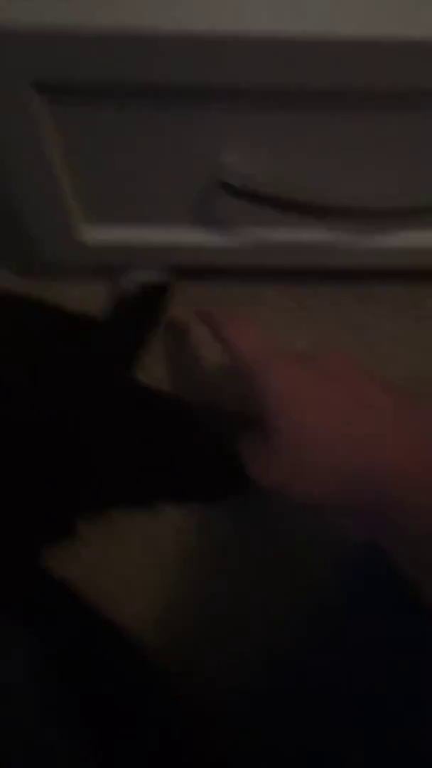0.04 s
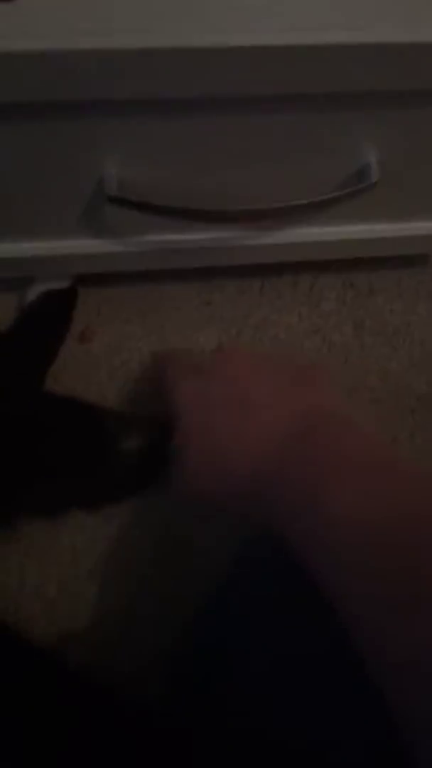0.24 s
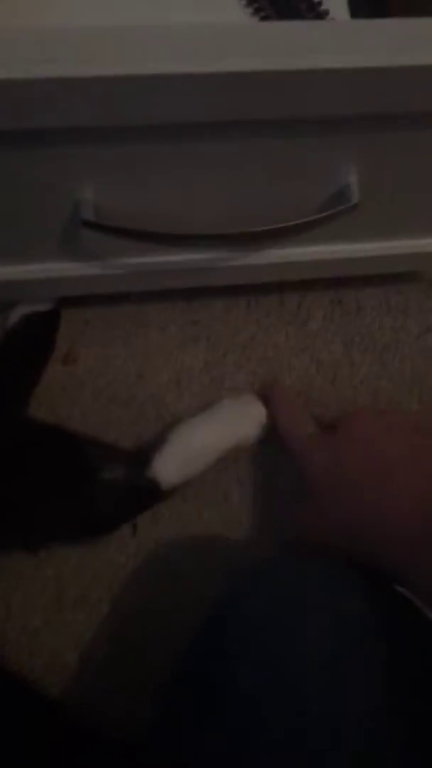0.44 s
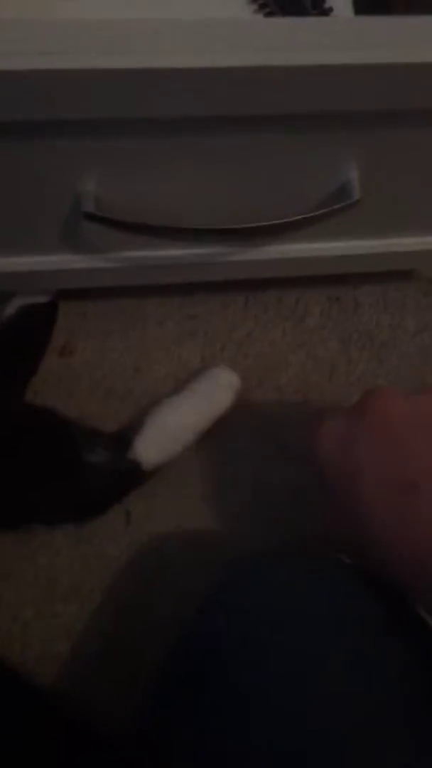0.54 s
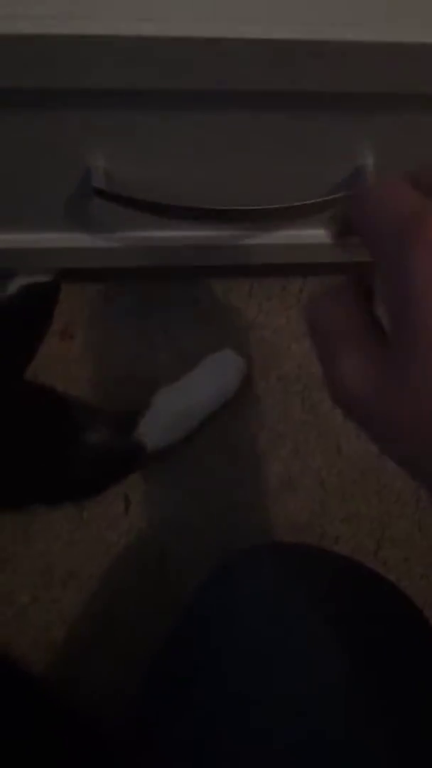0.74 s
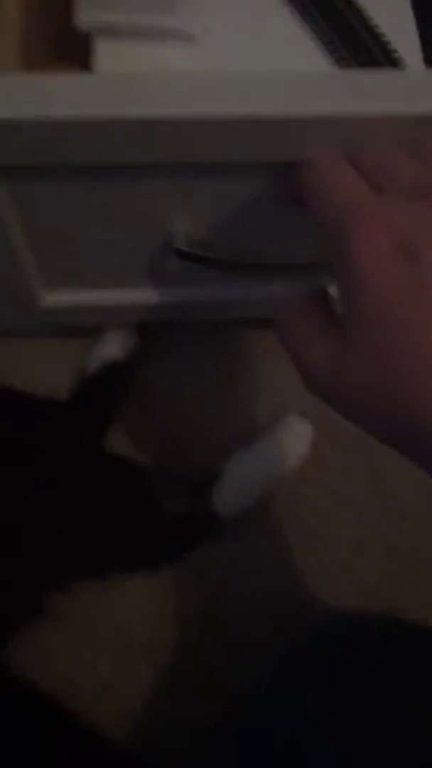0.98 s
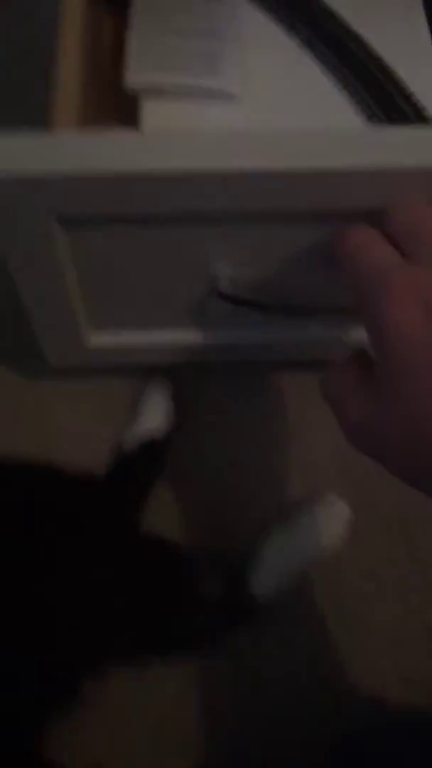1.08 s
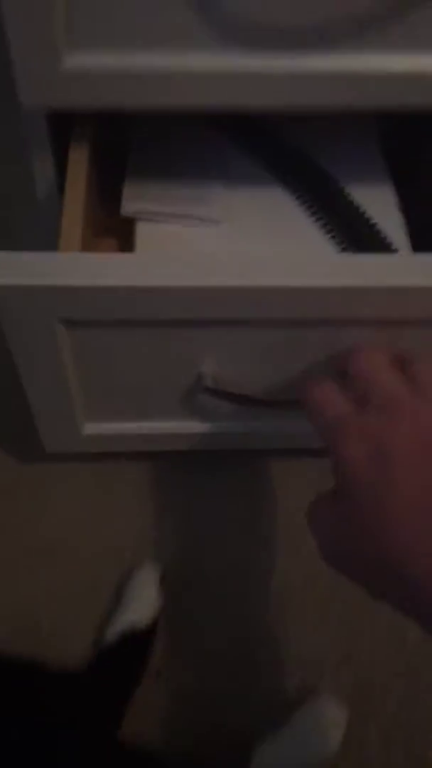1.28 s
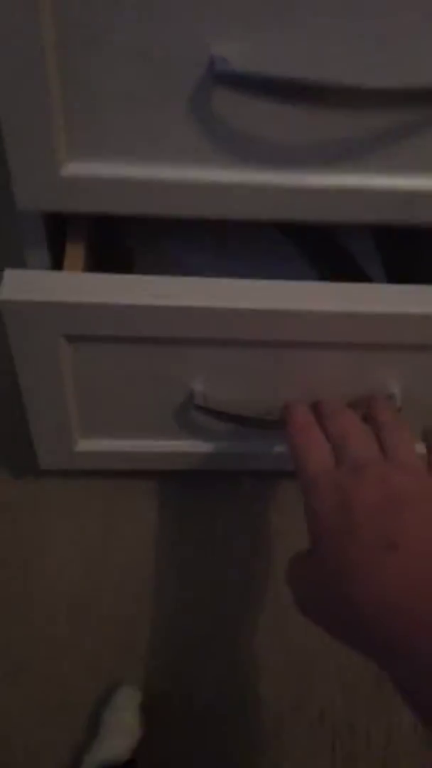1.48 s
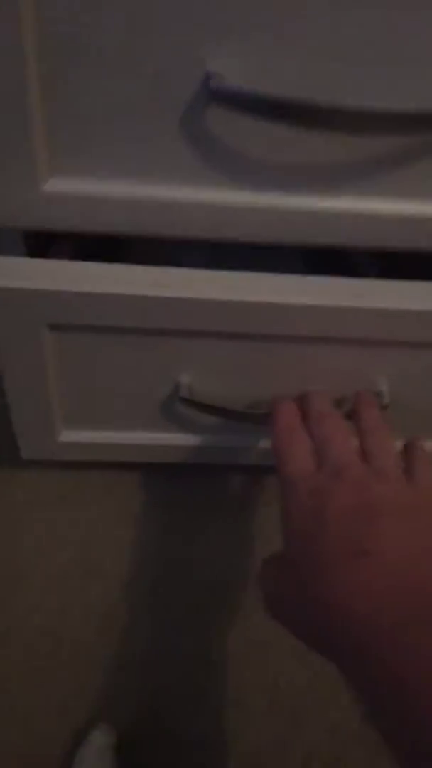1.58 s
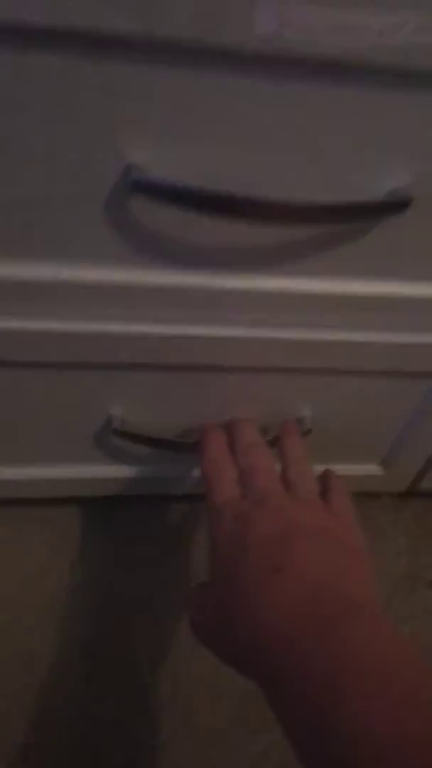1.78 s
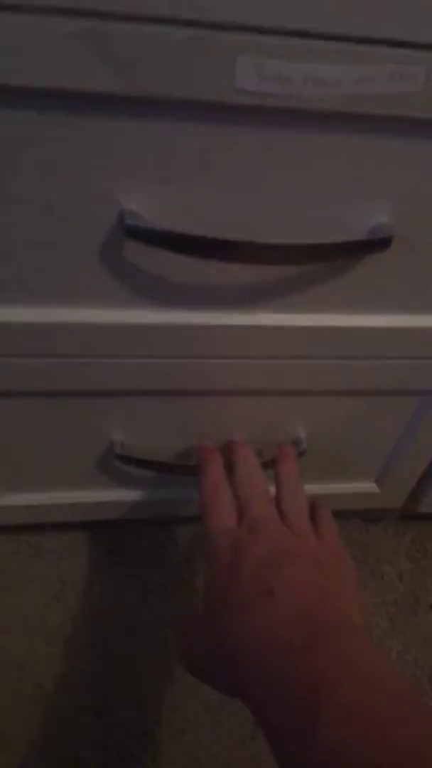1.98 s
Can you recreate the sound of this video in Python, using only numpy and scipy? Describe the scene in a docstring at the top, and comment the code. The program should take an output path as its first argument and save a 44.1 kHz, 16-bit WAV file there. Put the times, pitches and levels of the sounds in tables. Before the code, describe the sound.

Wooden drawer knocks open and rolls back on clacking runners, closing with a thud.

```python
"""A wooden drawer is pulled out by its handle and rolled back in a quiet, carpeted room.
It unseats with two knocks that ring its front. The rollers drum on the wooden box, scrape along the
runners and clack over a catch, ringing steel and wood; the drawer shuts with a low thud.
Close by: a rustling sleeve, a dull shuffle on the carpet, a few small clicks and soft bumps."""
import sys
import numpy as np
from scipy import signal
from scipy.fft import rfft, irfft
from scipy.io import wavfile

SR = 44100
rng = np.random.default_rng(int(sys.argv[2]) if len(sys.argv) > 2 else 0)


def persist_wave(psi):
    """Save psi, clipped to +-1, as 16-bit WAV."""
    counts = np.round(np.clip(psi, -1, 1) * 32767).astype(np.int16)
    wavfile.write(sys.argv[1], SR, np.atleast_2d(counts).T)


N = 89302
T = np.arange(N) / SR
FREQS = np.arange(N + 1) * SR / (2 * N)

# spectra (frequency [Hz], gain [dB])
ROOM_SPECTRUM = [(45, 13), (80, 8.5), (135, 2), (500, -13.5), (1000, -9), (2000, -9.5), (7000, -21),
                 (15500, -29)]
TICK_SPECTRUM = [(6000, 1), (10400, -11.5), (12000, 1.5), (15500, -11)]
SHUFFLE_SPECTRUM = [(280, 5.5), (560, 5.5), (1150, -15), (1900, -16), (4000, -58)]
SLEEVE_SPECTRUM = [(300, 1.5), (3000, 4.5), (3600, -1), (6500, -11), (15500, -34)]
SCRAPE_SPECTRUM = [(210, 4), (350, 11), (500, 3), (1400, -1), (2980, -8.5), (3380, -7), (3900, -17.5),
                   (6500, -22), (15500, -54)]
RUB_SPECTRUM = [(1500, 9.5), (3000, -10), (4100, 0.5), (4600, -12.5), (5400, -5), (6200, -10), (9200, -11),
                (10400, -21.5), (15500, -15)]
SLIDE_SPECTRUM = [(300, 0), (1200, 5.5), (5300, 1), (6100, -5), (6900, 0.5), (7600, -17), (9500, -11.5),
                  (10400, -23.5), (15500, -22)]
CLACK_SPECTRUM = [(600, -11.5), (2300, 6.5), (3100, -1), (3750, 0), (6300, -10), (7700, -18), (9300, -23.5),
                  (10400, -35), (15500, -44)]
# friction envelopes (time [s], level [dB])
SHUFFLE_DB = [(0, -74.5), (.4, -74.5), (.62, -69), (.95, -69.5)]
SLEEVE_DB = [(0, -67), (.07, -66), (.15, -70), (.22, -79.5), (.39, -89), (.44, -76.5), (.62, -73),
             (.72, -88)]
SCRAPE_DB = [(.962, -110), (.972, -58), (1.1, -55), (1.2, -55), (1.26, -50), (1.31, -55), (1.36, -47),
             (1.45, -50.5), (1.5, -50), (1.545, -59.5), (1.6, -52.5), (1.68, -54.5), (1.74, -58.5),
             (2.02, -67.5)]
RUB_DB = [(.955, -55), (.975, -61.5), (1.15, -60.5), (1.28, -65), (1.5, -98)]
SLIDE_DB = [(.96, -105), (1.1, -78), (1.3, -66.5), (1.54, -69), (1.64, -59.5), (1.85, -58.5), (2.02, -56.5)]

# cloth swishes (time [s], level [dB], attack [s], t60 [s])
SWISHES = [(.05, -64.5, 0.018, 0.31), (0.404, -67, 0.021, 0.45)]
# dry clicks (time [s], level before band-pass [dB], pitch [Hz], t60 [s])
CLICKS = [(0.165, -55, 5750, 0.006), (0.1725, -43.5, 2840, 0.013), (0.173, -43, 2200, 0.0024),
          (1.9355, -19, 2410, .0026)]
# handling bumps (time [s], level [dB], pitch [Hz])
BUMPS = [(.238, -43.5, 136), (0.385, -53, 129), (.447, -56, 140), (.634, -53.5, 157)]
# contacts breaking free (time [s], level [dB])
TICKS = [(0.165, -67.5), (.967, -69.5), (1.343, -62), (1.447, -67), (1.67, -62.5)]
# unseating knocks (time [s], level [dB], gain of modes above 400 Hz [dB])
KNOCKS = [(.968, -38, -2.5), (1.0725, -39.5, 7), (1.081, -47.5, 8)]
# roller clacks, then a low thud as the drawer shuts
# (time [s], rattle and steel [dB], tilt [dB/oct], sides [dB], thump [dB], thump pitch [Hz])
IMPACTS = [(1.2553, -46, -4.5, -49, -44.5, 248), (1.276, -50.5, -12, -42.5, -52.5, 244),
           (1.336, -55, 3, -47, -54, 149), (1.343, -56.5, 3, -48.5, -30.5, 209.4),
           (1.417, -50.5, -6, -63, -23, 190), (1.446, -50.5, -0.5, -69, -49.5, 156),
           (1.495, -57.5, 3.5, -66, -64, 149), (1.5607, -41, 5.5, -65, -34, 277.5),
           (1.567, -42.5, -6, -74, -23, 200.6), (1.574, -44.5, -1, -63, -29, 96),
           (1.584, -50, -4, -72, -29, 196.6), (1.612, -49.5, -3.5, -68, -45, 133),
           (1.668, -49.5, 0.5, -80, -43, 450.5), (1.997, -98, -12, -90, -28.5, 103.3)]
# rolling envelopes (time [s], relative drum level [dB], relative box level [dB])
ROLL_DB = [(1.08, -46, -43), (1.15, -36.5, -36), (1.19, -45, -33), (1.23, -32.5, -36.5), (1.285, -31, -35),
           (1.312, -38, -37.5), (1.346, -21.5, -33), (1.38, -25.5, -32), (1.408, -38, -33.5),
           (1.438, -29, -35), (1.546, -39.5, -38.5), (1.58, -32, -34), (1.65, -34.5, -34),
           (1.696, -44, -38.5), (1.77, -41.5, -38), (1.846, -45.5, -46), (1.93, -43.5, -45.5),
           (1.97, -56.5, -53.5)]
# drum pitch, lower as the rollers slow (time [s], pitch [Hz])
DRUM_HZ = [(1.09, 170), (1.17, 143.1), (1.3, 161.1), (1.39, 139.7), (1.44, 156.7), (1.53, 147),
           (1.6, 126.1), (1.66, 116.5), (1.79, 143.8), (1.86, 129.8)]

# drawer front (frequency [Hz], gain [dB], t60 [s])
FRONT_MODES = [(205, 0.5, 0.47), (264.3, -9, 0.35), (466, -12.5, 0.084), (620, -8, 0.098),
               (768.5, -2, 0.088), (839, -6, 0.075), (1525, -10.5, 0.039)]
# steel runners (frequency [Hz], gain [dB], t60 [s])
STEEL_MODES = [(2325, 1.5, 0.13), (2628, -5.5, .1), (3630, -3, 0.28), (4040, -3, 0.15), (5300, -11, 0.14),
               (9200, -19, 0.12)]
# wooden sides (frequency [Hz], gain [dB])
SIDE_MODES = [(565, -2), (1045, -5), (1433, 3), (2735, -10.5), (3340, -6.5)]
# wooden box (frequency [Hz], width [Hz], gain [dB])
BOX_MODES = [(98.1, 14.2, -3.5), (120.4, 16.5, -3.5), (152.95, 13.4, -4.5), (197.24, 19.7, -0.5),
             (215, 27.8, -1.5), (265.7, 26.7, -4.5)]

UNSEAT_S = KNOCKS[0][0]


def undb(db):
    """Decibels to gain."""
    return 10 ** (np.asarray(db) / 20)


def unit(x):
    """Scale to rms 1."""
    return x / np.std(x)


def curve(rows):
    """Interpolate (time [s], value) rows."""
    return np.interp(T, *np.array(rows).T)


def filtered(x, response):
    """Apply a frequency response."""
    return irfft(rfft(x, 2 * N) * response)[:N]


def colour(x, spectrum, tilt_db_oct=0):
    """Shape x by a tilted spectrum, rolled off below its first point; rms 1."""
    hz, db = np.array(spectrum).T
    octave = np.log2(np.maximum(FREQS, 1))
    gain = undb(np.interp(octave, np.log2(hz), db + tilt_db_oct * np.log2(hz)))
    return unit(filtered(x, gain * np.minimum(FREQS / hz[0], 1) ** 2))


def resonate(x, modes):
    """Parallel squared band-passes (frequency [Hz], width [Hz], gain [dB]); rms 1."""
    s = 1j * FREQS
    response = sum(undb(db) * (s * width / (s * s + s * width + hz ** 2)) ** 2 for hz, width, db in modes)
    return unit(filtered(x, response))


def fade(start_s, t60_s):
    """Exponential decay from start_s."""
    return (T >= start_s) * np.exp(-np.log(1000) * np.maximum(T - start_s, 0) / t60_s)


def ramp(start_s, rise_s):
    """Linear rise from 0 to 1."""
    return np.clip((T - start_s) / rise_s, 0, 1)


def ring(start_s, hz, t60_s, push_s=0):
    """One struck mode; a soft contact makes it swell."""
    swell = np.sin(np.pi / 2 * ramp(start_s, push_s + 1e-9)) ** 2
    return swell * fade(start_s, t60_s) * np.sin(2 * np.pi * hz * (T - start_s))


def scattered_ring(start_s, hz, t60_s, detune, contact_s=0.003317):
    """One struck mode with random onset delay and detuning."""
    onset_s = start_s + contact_s * rng.random()
    return ring(onset_s, hz * (1 + detune * rng.standard_normal()), t60_s, push_s=1 / hz)


def noise():
    """White noise."""
    return rng.standard_normal(N)


def drift(bandwidth_hz):
    """Smooth random drift; rms 1."""
    return unit(filtered(noise(), np.exp(-(FREQS / bandwidth_hz) ** 2)))


def grains(per_s, spread_db):
    """Random tiny impacts of uneven size."""
    impulses = (rng.random(N) < per_s / SR) * rng.choice([-1, 1], N)
    return impulses * undb(spread_db * np.minimum(rng.exponential(size=N), 4))


def room_tone(level_db=-69.5):
    """Faint steady background."""
    return undb(level_db) * colour(noise(), ROOM_SPECTRUM)


def room_echo(x, t60_s=0.2, gain_db=-18, low_cut_hz=300):
    """Short diffuse tail of a small, dead room."""
    tail = noise() * fade(0.0036, t60_s)
    walls = rfft(tail / np.linalg.norm(tail), 2 * N) * FREQS / (FREQS + low_cut_hz)
    return undb(gain_db) * filtered(x, walls)


def shuffle():
    """Dull friction on the carpet."""
    return colour(noise(), SHUFFLE_SPECTRUM) * undb(curve(SHUFFLE_DB))


def sleeve():
    """Grainy cloth rustle with brighter swishes."""
    out = colour(grains(per_s=6000, spread_db=2.8), SLEEVE_SPECTRUM) * undb(curve(SLEEVE_DB))
    for start_s, db, attack_s, t60_s in SWISHES:
        swish = colour(noise(), SLEEVE_SPECTRUM, tilt_db_oct=7)
        out += undb(db) * swish * ramp(start_s, attack_s) * fade(start_s, t60_s)
    return out


def clicks(low_ratio=0.63, low_db=-6.5, band_hz=3620):
    """Small dry clicks: two modes each, band-passed."""
    band = signal.butter(2, [band_hz / 3, band_hz * 1.83], "band", fs=SR)
    out = np.zeros(N)
    for start_s, db, hz, t60_s in CLICKS:
        low_mode = undb(low_db) * ring(start_s, hz * low_ratio, t60_s / low_ratio)
        out += undb(db) * signal.lfilter(*band, ring(start_s, hz, t60_s) + low_mode)
    return out


def bumps(length_s=0.019):
    """Soft handling bumps: short windowed low tones."""
    out = np.zeros(N)
    for start_s, db, hz in BUMPS:
        push = np.sin(np.pi * ramp(start_s, length_s)) ** 2
        out += undb(db) * push * np.sin(2 * np.pi * hz * (T - start_s))
    return out


def slide():
    """Smooth sliding hiss with a flickering level."""
    return colour(noise(), SLIDE_SPECTRUM) * undb(curve(SLIDE_DB) + drift(30))


def rub():
    """Bright rub of the wooden sides."""
    friction = colour(grains(per_s=9000, spread_db=1.4), RUB_SPECTRUM)
    return friction * undb(curve(RUB_DB)) * (T > UNSEAT_S)


def scrape(chatter_db=-5, width_hz=260):
    """Gritty scrape on the runners; sparser chatter rings sides and steel."""
    grit = colour(grains(per_s=6000, spread_db=2.2) * undb(drift(43)), SCRAPE_SPECTRUM)
    modes = [(hz, width_hz, db - 3 * np.log2(hz / SIDE_MODES[0][0]))
             for hz, db, *_ in SIDE_MODES + STEEL_MODES[:2]]
    chatter = resonate(grains(per_s=400, spread_db=1.5), modes)
    return unit(grit + undb(chatter_db) * chatter) * undb(curve(SCRAPE_DB))


def ticks(t60_s=0.04):
    """Crisp noise bursts as contacts break free."""
    envelope = sum(undb(db) * fade(start_s, t60_s) for start_s, db in TICKS)
    return colour(noise(), TICK_SPECTRUM) * envelope


def knocks(push_s=0.028, crack_db=-3.5):
    """The front is tugged free: a crack, then ringing; low modes swell last."""
    out = np.zeros(N)
    for start_s, db, treble_db in KNOCKS:
        front = np.zeros(N)
        for hz, mode_db, t60_s in FRONT_MODES:
            swell_s = push_s * FRONT_MODES[0][0] / hz
            front += undb(mode_db + treble_db * (hz > 400)) * ring(start_s, hz, t60_s, swell_s)
        crack = colour(noise(), SCRAPE_SPECTRUM, tilt_db_oct=-3) * fade(start_s, t60_s=0.028)
        out += undb(db) * (front + undb(crack_db) * crack)
    return out


def impacts(tail_db=-5.5, steel_db=-7.5, overtone_ratio=1.4, overtone_db=-15):
    """Roller clacks (rattle, steel and side ring, box thump), then a low thud as the drawer shuts."""
    out = np.zeros(N)
    for start_s, db, tilt_db_oct, sides_db, thump_db, thump_hz in IMPACTS:
        decay = fade(start_s, t60_s=0.054) + undb(tail_db) * fade(start_s, t60_s=0.3)
        rattle = ramp(start_s, rise_s=0.0013) * decay * colour(noise(), CLACK_SPECTRUM, tilt_db_oct)
        steel = np.zeros(N)
        for hz, mode_db, t60_s in STEEL_MODES:
            gain = undb(steel_db + mode_db + tilt_db_oct * np.log2(hz / STEEL_MODES[0][0]))
            steel += gain * scattered_ring(start_s, hz, t60_s, detune=0.012)
        sides = sum(undb(mode_db) * scattered_ring(start_s, hz, t60_s=0.085, detune=0.015)
                    for hz, mode_db in SIDE_MODES)
        thump = sum(undb(mode_db) * ring(start_s, hz, t60_s=0.18, push_s=0.011)
                    for hz, mode_db in [(thump_hz, 0), (thump_hz * overtone_ratio, overtone_db)])
        out += undb(db) * (rattle + steel) + undb(sides_db) * sides + undb(thump_db) * thump
    return out


def rollers(wander_hz=5, flutter_db=1.2, octave_off_db=-14.5):
    """Rollers drum at a wavering pitch and ring the box; slower rollers favour its lower modes."""
    pitch_hz = curve(DRUM_HZ)
    phase = 2 * np.pi * np.cumsum(pitch_hz + wander_hz * drift(34.5)) / SR
    drum = unit(np.sin(phase) * undb(flutter_db * drift(52)))
    box, power = 0, 0
    for hz, width_hz, db in BOX_MODES:
        mode = signal.hilbert(resonate(grains(per_s=900, spread_db=1.8), [(hz, width_hz, 0)]))
        levelled = unit(mode.real / np.sqrt(0.5 + np.abs(mode) ** 2))
        weight = undb(db + octave_off_db * np.log2(hz / pitch_hz) ** 2)
        box += weight * levelled
        power += weight ** 2
    times_s, drum_db, box_db = np.array(ROLL_DB).T
    drum *= undb(np.interp(T, times_s, drum_db))
    box *= undb(np.interp(T, times_s, box_db)) / np.sqrt(power)
    onset = curve([(UNSEAT_S, 0), (0.985, 0.48), (1.06, 0.22), (1.095, 0.86)])
    return (drum + box) * onset


def scene(box_low_hz=83.6):
    """Drawer and hand in the room, mono; the box radiates no deep bass."""
    radiation = 1 / np.sqrt(1 + (box_low_hz / np.maximum(FREQS, 1)) ** 10)
    drawer = filtered(rollers() + ticks() + impacts(), radiation) + scrape() + rub() + slide() + knocks()
    direct = drawer + sleeve() + shuffle() + clicks() + bumps()
    return (direct + room_echo(direct) + room_tone())[None]


def record(dry, top_hz=15600):
    """Steep elliptic low-pass."""
    return signal.sosfilt(signal.ellip(8, 0.2, 70, top_hz, fs=SR, output="sos"), dry)


dry = scene()
out = record(dry)
persist_wave(out)
```